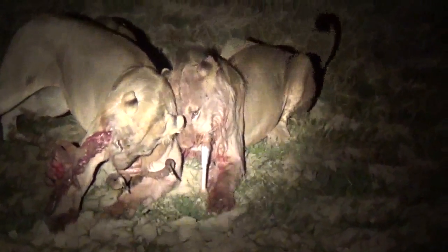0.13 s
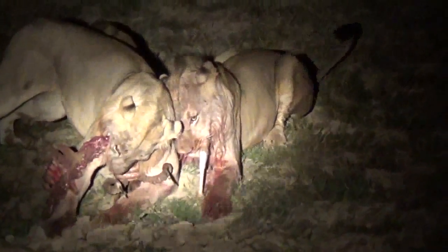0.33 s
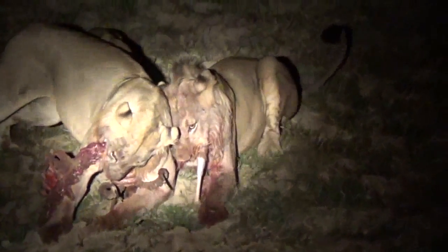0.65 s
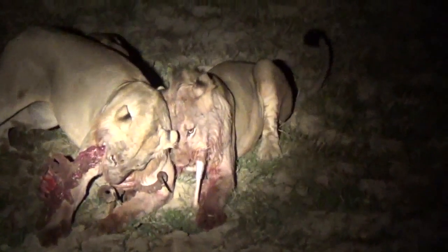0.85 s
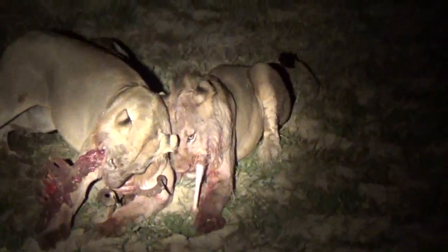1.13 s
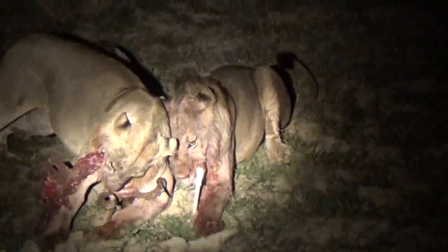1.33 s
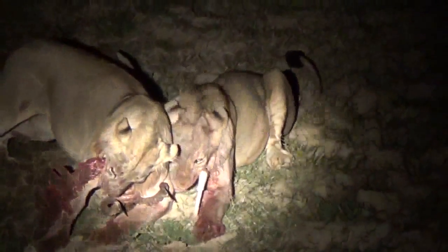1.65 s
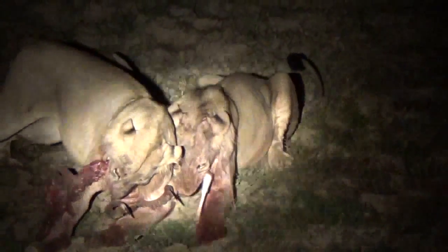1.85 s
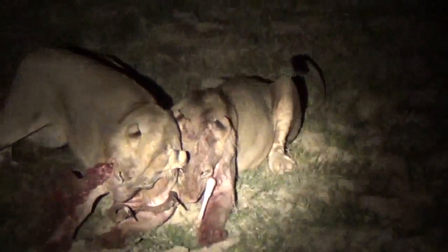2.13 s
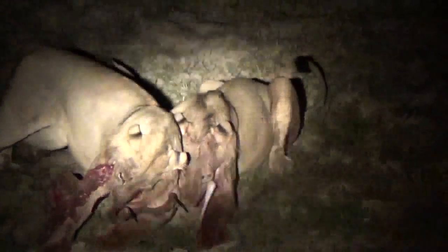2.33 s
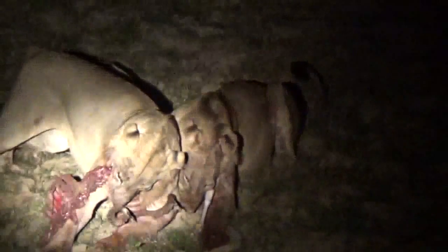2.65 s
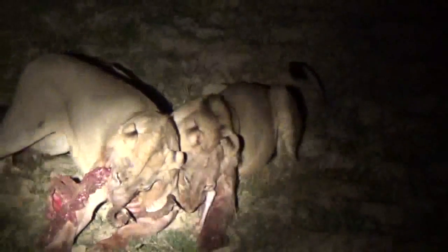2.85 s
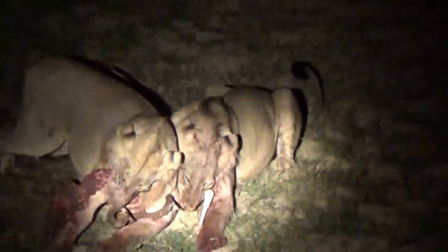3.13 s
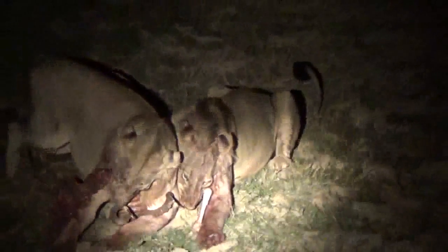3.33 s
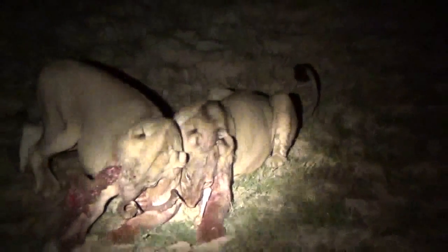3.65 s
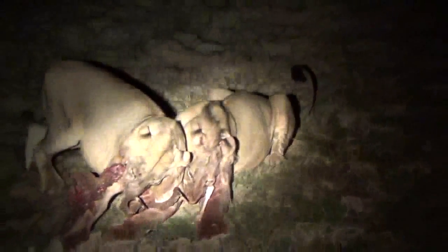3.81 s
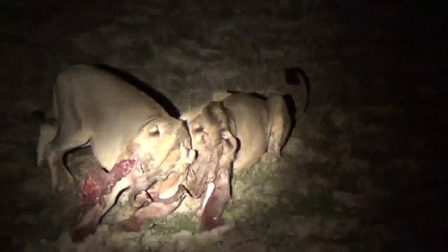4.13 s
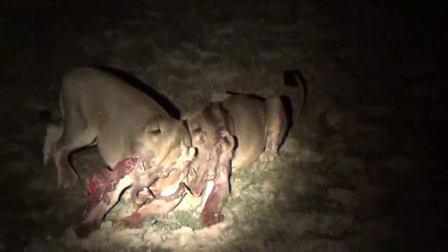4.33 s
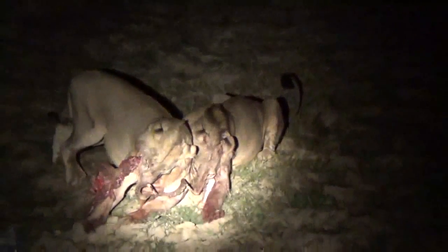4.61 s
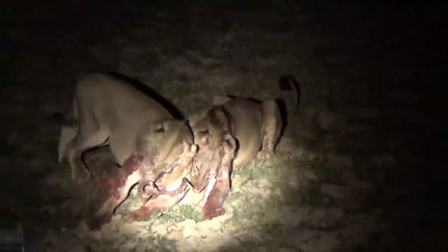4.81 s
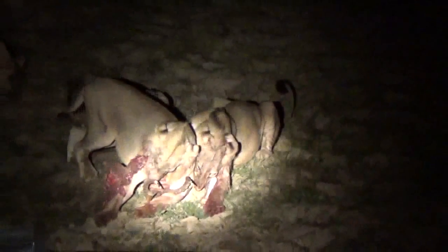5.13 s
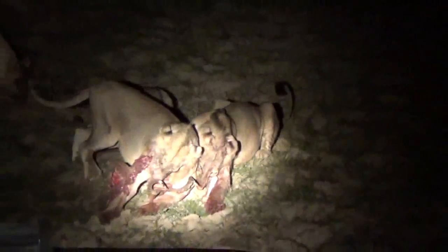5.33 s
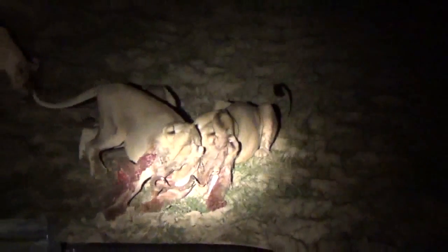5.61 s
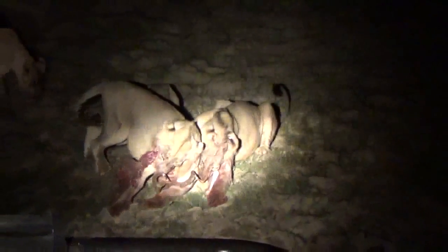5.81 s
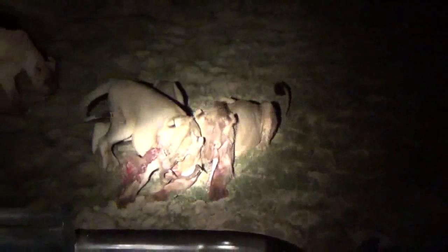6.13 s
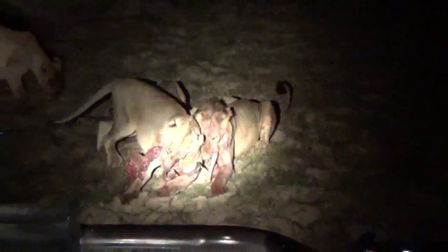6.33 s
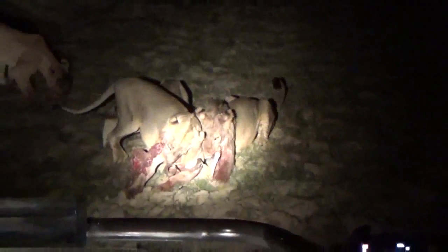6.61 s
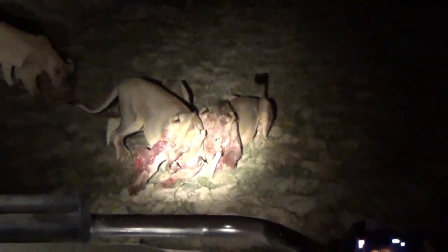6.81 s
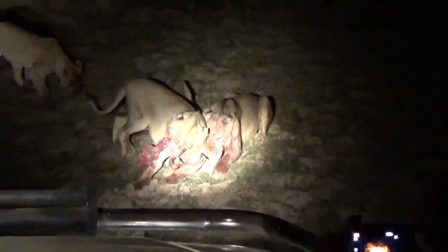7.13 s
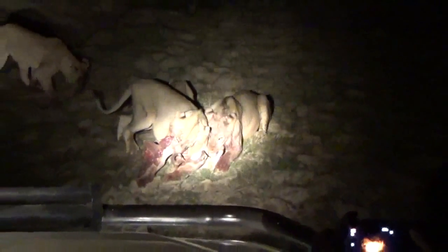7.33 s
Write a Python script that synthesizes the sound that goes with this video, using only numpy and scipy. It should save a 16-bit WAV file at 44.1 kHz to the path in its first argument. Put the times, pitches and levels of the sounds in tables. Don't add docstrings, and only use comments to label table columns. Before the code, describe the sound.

Night in open grass, heard in stereo a few metres from feeding big cats. A rattling growl is already loud at the start, with a second abrupt one at 0.3 seconds, soft smacks and a bright tick. A faint grunt follows near 0.8 and a hard knock at 1.0. A brief low moan at 1.2 leads to a chesty growl around 1.5, then the loudest, ringing and falling from 2.1 to 3. A faint click comes at 3.1. Growling returns at 4 and strongly at 4.5, with small bone cracks near 4.2. Around 5.1 to 5.5 there are smacks, cracks, a chesty growl and breathy snarls with a snort. A tight click at 5.8 and a heavier thump with a crack at 6.2 precede a weak growl at 6.7 and a faint snarl at 7.4. Crickets chirp about twice a second each, a katydid rasps in waves, and a far chorus trills over soft hiss.

```python
import sys
import numpy as np
from scipy import signal
from scipy.fft import rfft, irfft
from scipy.io import wavfile
from scipy.ndimage import uniform_filter1d

SR = 44100
rng = np.random.default_rng(int(sys.argv[2]) if len(sys.argv) > 2 else 0)


def generate_wav(sig):
    pcm = np.round(np.clip(np.atleast_2d(sig).T, -1, 1) * 32767).astype(np.int16)
    wavfile.write(sys.argv[1], SR, pcm)


def to_linear_factor(level_db):
    exponent = np.asarray(level_db, float) / 20
    return 10 ** exponent


N = 328986
TIME = np.arange(N) / SR

# [t/s of the flap at its height, flap rate there/Hz, slowing/(Hz per s)]
GROWL_PACE = [
    (.123, 28.3, 3),
    (.29, 33, 12),
    (.78, 25, 8),
    (1.4826, 24.6, 13),
    (2.116, 26.7, 6.5),
    (3.985, 23.6, 8),
    (4.5207, 24.8, 10.8),
    (5.32, 25.5, 12),
    (6.697, 23.5, 8),
]
# [attack/s, release/s, throat level/dB, chest level/dB, rasp level/dB]
GROWL_EFFORT = [
    (0.91, 0.3, -46, -46.5, -60),
    (.05, 0.14, -50, -48, -63),
    (.1, 0.13, -66.5, -67, -71),
    (0.26, 0.31, -62.5, -57.5, -65.5),
    (.23, 0.86, -40, -48, -55),
    (0.14, 0.44, -57.5, -53, -62),
    (.27, 0.43, -44, -49.5, -58),
    (.17, 0.2, -59.5, -47, -65),
    (0.311, 0.28, -65, -61.5, -68.5),
]
# [loss at start of attack/dB, its curve power, loss at end of release/dB, its curve power]
SWELL_SHAPE = [
    (28, 2.83, 27.5, 2.42),
    (22, 3.5, 16, 1.27),
    (14, 5.6, 10.5, 3),
]
# [t/s, rebound flap over first flap/dB, roughness 0-1]
MANNER = [(0, -2, .35), (.5, -4, .4), (1.4, -8, .25), (1.95, 1, .12), (2.05, 6, .08), (2.17, 6, .1),
          (2.26, -1, .1), (2.36, -10, .14), (2.7, -2, .3), (4.0, -4, .35), (4.4, -2, .1), (4.48, -15, .07),
          (4.62, -12, .07), (4.72, -1, .25), (5.3, -1, .15), (6.7, -4, .5)]
SPEED_UP_HZ_PER_S, CLOSING_DB_PER_S = 8, 120
REBOUND_S, FLAP_S = .0133, .0061
# [f/Hz, width/Hz, level/dB]
THROAT_MODES = [(150, 42, -15.5), (217, 32, 0)]
PHARYNX_MODES = [(313.8, 42, -23.5), (520, 376, -38.5), (744, 340, -40)]
CHEST_MODES = [(51.4, 35, -7.5), (92, 95, -6)]
MOUTH_MODES = [(1287, 160, -1.5), (1580, 240, -0.5), (1900, 240, -6), (2164, 380, 2)]
# [middle t/s, half length/s, level/dB, mouth resonance f/Hz]
SNARLS = [
    (5.239, .09, -57, 560),
    (5.312, 0.054, -53.5, 625),
    (5.386, 0.019, -49, 588),
    (5.439, 0.056, -63, 575),
    (7.375, 0.058, -64, 620),
]
SNARL_FADE_DB = 8.5
# [f/Hz, width/Hz, level/dB]
SNARL_UPPER_MODES = [(1236, 80, 4), (1430, 140, 2)]
# [t/s, f/Hz, level/dB]
MOAN = [
    (1.15, 97.7, -80),
    (1.198, 104, -58),
    (1.224, 102, -56),
    (1.304, 98, -59),
    (1.309, 98.3, -66),
]
# [t/s, peak level/dB, f/Hz, t60/s]
SMACKS = [(.055, -51, 626, .098), (.262, -45.5, 636, .03), (.287, -47, 290, .04), (.46, -51, 570, .054),
          (2.56, -52, 520, .15), (2.629, -52, 540, .087), (3.459, -48.5, 520, .077), (4.05, -52, 490, .089),
          (4.158, -54, 377, .15), (4.2, -51, 303, .12), (4.398, -50, 1600, .06), (4.43, -55, 1430, .08),
          (5.097, -39.5, 457, .023), (5.098, -50, 233, .057), (5.1, -51, 900, .03), (5.133, -47, 370, .05),
          (5.168, -52, 1230, .07), (5.261, -51, 420, .15), (5.286, -49, 1220, .08), (5.33, -51, 330, .12),
          (5.501, -41.5, 115, .046), (5.797, -52, 1200, .03), (7.336, -58, 1260, .13)]
# [f/Hz, peak level/dB, t60/s]
THUMP_RINGS = [(180, -42.5, 0.031), (277, -46.5, 0.18), (460, -47.5, 0.022), (710, -54, 0.12),
               (1010, -50, 0.049)]
THUMP_S = 6.248
# [t/s, peak level/dB, low ring f/Hz, brightness/dB, scatter/s]
GEAR_CLICKS = [
    (0.2474, -26.5, 1493, 24, 0.00113),
    (0.9618, -18, 860, -8, .0015),
    (3.128, -42.5, 1830, -16, .006),
    (5.8495, -32, 1780, -8, 0.00062),
]
BONE_CLICKS = [
    (4.165, -44, 1820, -4, 0.0057),
    (4.183, -38.5, 1700, -11, 0.0019),
    (4.239, -44, 1600, -8, .004),
    (5.129, -40, 1900, -11, 0.0074),
    (5.221, -42, 1186, -29, 0.0065),
    (6.244, -32, 1810, -16, 0.01),
]
# [f/Hz, level/dB, t60/s]
CLICK_BODY = [(1070, 2, 0.018), (1335, 2.5, 0.019), (1614, -1.5, 0.027), (1900, 8, 0.0062),
              (2130, 9, 0.021), (2820, 5.5, 0.016), (3170, 5.5, 0.026), (3890, 0, 0.018), (4910, 0, 0.0081),
              (6030, -13.5, 0.0039), (8300, -31, 0.0027), (10000, -14, 0.0012)]
GEAR_PAN_DB, BONE_PAN_DB, CLICK_T60_S = 4.5, 0, 0.02
# [delay/s, level/dB]
ECHOES = [(.0035, -9.5), (.0052, -8), (.0081, -25), (.011, -17)]
RISING_FIRST_S, RISING_PERIOD_S, HURRY_FROM_S, HURRY_SHARE = .036, .3998, 6.03, .037
RISING_DB, RISING_SPREAD_DB = -56.5, .5
# [t/s, level/dB]
FADING_CRICKET = [(.11, -61), (.51, -60), (.92, -61), (1.32, -61.5), (1.73, -58), (2.13, -65), (4.13, -67),
                  (4.75, -59), (5.14, -60), (5.545, -56.5), (5.94, -59), (6.35, -57)]
# [first t/s, period/s, f/Hz, chirp length/s, level/dB, left over right/dB, tooth flutter 0-1]
EVEN_CRICKETS = [
    (.088, .4221, 3714, .13, -58, -1, .3),
    (.14, .455, 3980, .07, -64, 6, .2),
    (.26, .458, 3620, .08, -67, 0, .2),
]
# [start t/s, length/s, level of the rest that follows/dB]
KATYDID_WAVES = [(-.1, 0.56, -70), (.87, 0.5, -74), (1.814, 0.42, -70), (2.67, 0.5, -69.5),
                 (3.62, 0.43, -72), (4.445, 0.46, -66.5), (5.344, .45, -76), (6.202, .42, -70),
                 (7.073, .5, -70)]
KATYDID_STROKES_HZ, KATYDID_DB, KATYDID_RISE_S, KATYDID_FALL_S = 27, -63, 0.11, 0.062
# [f/Hz, width/Hz, level/dB, left-right likeness 0-1, left over right/dB, flicker/dB]
CHORUS_BANDS = [
    (2398.5, 149, -57, 0.78, 1, 0.5),
    (3844, 490, -58.5, 0.53, 1, 1.5),
    (6376, 1300, -63, 0.66, 1.5, 1.38),
    (3043, 270, -70.5, 0.21, -0.5, 1),
]
# [f/Hz, level/dB]
NIGHT_COLOUR = [(25, -28), (45, -3), (90, -4), (220, 0.5), (500, -3.5), (850, -2.5), (1100, -7),
                (1900, -10), (3000, -20.5), (4900, -15), (8300, -18), (11200, -15)]
# [f/Hz, likeness 0-1]
NIGHT_LIKENESS = [(60, 0.94), (200, 0.82), (400, 0.42), (900, 0.04), (2000, 0), (5000, 0.47), (11000, 0.66)]
NIGHT_DB = -58
TREBLE_END_HZ = 11060


def flap_count():
    count = np.zeros(N)
    for (s, rate, slowing), (attack, *_) in zip(GROWL_PACE, GROWL_EFFORT):
        t = TIME - s
        mine = t > -attack
        change = np.where(t < 0, SPEED_UP_HZ_PER_S, -slowing)
        count[mine] = (rate * t + change * t ** 2 / 2)[mine]
    return count


def flaps():
    rebound_db, rough = in_time(MANNER)
    at = np.flatnonzero(np.diff(np.floor(flap_count())) > 0)
    chance = rng.standard_normal((4, len(at))) * rough[at]
    pulses = np.zeros(N + SR)
    first = np.maximum(at + (SR * (.001 + .006 * chance[0])).astype(int), 0)
    pulses[first] += to_linear_factor(6 * chance[1])
    delay = (REBOUND_S - .00026 * np.maximum(rebound_db[at], 0)) * (1 + .3 * chance[2])
    pulses[first + (SR * delay).astype(int)] += to_linear_factor(rebound_db[at] + 3.3 * chance[3])
    pulses = pulses[:N]
    puff = signal.lfilter([1], [1, -np.exp(-1 / (.0055 * SR))], pulses)
    return pulses, puff, rough


def effort():
    out = np.zeros((3, N))
    for (s, *_), (attack, release, *peaks_db) in zip(GROWL_PACE, GROWL_EFFORT):
        before = np.maximum(s - TIME, 0) / attack
        after = np.maximum(TIME - s, 0) / release
        closed_s = np.maximum(np.maximum(s - attack - TIME, TIME - s - release), 0)
        for k, (rise_db, rise_power, fall_db, fall_power) in enumerate(SWELL_SHAPE):
            loss_db = rise_db * before ** rise_power + fall_db * after ** fall_power
            loss_db = loss_db + CLOSING_DB_PER_S * closed_s
            out[k] = np.maximum(out[k], to_linear_factor(peaks_db[k] - loss_db))
    return out


def growls(pulses, puff, rough):
    throat_gain, chest_gain, rasp_gain = effort()
    air = rng.standard_normal((3, N))
    source = .11 * rough * air[0] * (puff + .3) - pulses
    pressed = to_linear_factor(0.33 * in_time(MANNER)[0])
    flap = np.hanning(int(FLAP_S * SR))
    soft = np.convolve(source, flap / flap.sum(), "same")
    upper_throat = band(cavity(source, PHARYNX_MODES), 355, 570)
    throat = even_out(cavity(soft, THROAT_MODES) + pressed * upper_throat)
    chest = even_out(cavity(uniform_filter1d(soft, size=300), CHEST_MODES))
    breath = air[2] * (puff + .2) + 4.5 * pulses
    mouth = pressed ** 2.4 * cavity(breath, MOUTH_MODES[:2]) + cavity(breath, MOUTH_MODES[2:])
    rasp = even_out(band(mouth, 1250, 2700))
    return throat_gain * throat + chest_gain * chest + rasp_gain * rasp


def snarls(puff):
    levels_db = [db - SNARL_FADE_DB * ((TIME - s) / half) ** 2 for s, half, db, _ in SNARLS]
    mouth_hz = in_time(SNARLS)[2]
    air = rng.standard_normal((3, N)) * (puff + 1.2)
    narrow = signal.sosfilt(signal.butter(2, 24, fs=SR, output="sos"), air[:2])
    turns = 2 * np.pi * np.cumsum(mouth_hz) / SR
    low = even_out(narrow[0] * np.cos(turns) + narrow[1] * np.sin(turns), span_s=0.043)
    upper = to_linear_factor(-7.5) * rms_one(cavity(air[2], SNARL_UPPER_MODES))
    hoarse = to_linear_factor(-3) * rms_one(band(air[2], 320, 1220))
    flutter = to_linear_factor(-3) * rms_one(band(puff, 92, 130))
    return to_linear_factor(np.max(levels_db, axis=0)) * (low + upper + hoarse + flutter)


def moan():
    s, hz, level_db = np.transpose(MOAN)
    turns = 2 * np.pi * np.cumsum(np.interp(TIME, s, hz)) / SR
    return np.sqrt(2) * to_linear_factor(np.interp(TIME, s, level_db, -120, -120)) * np.sin(turns)


def smacks():
    out = np.zeros(N)
    thump = [(THUMP_S, db, hz, t60) for hz, db, t60 in THUMP_RINGS]
    for s, db, hz, t60 in SMACKS + thump:
        push = np.zeros(int(.3 * SR))
        push[:150] = rng.standard_normal(150) * np.hanning(150)
        sound = ring(push, hz, t60) + .5 * ring(-push, hz * 1.19, t60 * 0.85)
        i = int(s * SR)
        out[i:i + len(sound)] += (to_linear_factor(db) * sound / np.abs(sound).max())[:N - i]
    return out


def clicks():
    out = np.zeros((2, N))
    placed = [(*c, GEAR_PAN_DB) for c in GEAR_CLICKS] + [(*c, BONE_PAN_DB) for c in BONE_CLICKS]
    length = int(.2 * SR)
    for s, db, hz, bright_db, scatter, pan_db in placed:
        cracks = np.zeros((2, length))
        draw = rng.random((3, 6))
        cracks[:, (draw[0] * scatter * SR).astype(int)] = 2 * draw[1:] - 1
        cracks[:, 0] = 1
        bright = sum(to_linear_factor(mode_db + bright_db) * ring(cracks[k % 2], mode_hz, t60)
                     for k, (mode_hz, mode_db, t60) in enumerate(CLICK_BODY))
        fade = np.exp(-TIME[:length] / (0.0023 + scatter / 2))
        snap = to_linear_factor(bright_db + 11) * rng.standard_normal(length) * fade
        sound = band(ring(cracks[0], hz, CLICK_T60_S) + bright + snap, 500, 14000)
        i = int(s * SR)
        out[:, i:i + length] += pan(to_linear_factor(db) * sound / np.abs(sound).max(), pan_db)
    return out


def outdoors(x):
    bright = band(x.mean(axis=0), 730, 3300)
    out = x.copy()
    for k, (s, db) in enumerate(ECHOES):
        lag = int(s * SR)
        out[k % 2, lag:] += to_linear_factor(db) * bright[:-lag]
    return out


def crickets():
    due = RISING_FIRST_S + RISING_PERIOD_S * np.arange(19)
    due = due - HURRY_SHARE * np.maximum(due - HURRY_FROM_S, 0)
    rising = zip(due, rng.normal(RISING_DB, RISING_SPREAD_DB, len(due)))
    out = pan(chirps(rising, 3900, 225, .122, .12), 11)
    out += pan(chirps(FADING_CRICKET, 3795, -47, 0.17, 0.075), 1.1)
    for first, period, hz, length, db, pan_db, flutter in EVEN_CRICKETS:
        notes = [(s, db + rng.normal(0, 0.31)) for s in first + period * np.arange(18)]
        out += pan(chirps(notes, hz, -17, length, flutter), pan_db)
    return out


def chirps(notes, hz, glide_hz, length, flutter):
    out = np.zeros(N)
    t = np.arange(-length / 2, length / 2, 1 / SR)
    swell = np.abs(np.cos(np.pi * t / length)) ** .8
    pitch = hz + glide_hz * np.sin(2.6 * (t / length + .1)) / 2
    for s, db in notes:
        start = 2 * np.pi * rng.random(2)
        tone = np.sin(2 * np.pi * np.cumsum(pitch) / SR + start[0])
        teeth = 1 + flutter * np.sin(2 * np.pi * 86 * t + start[1])
        at = int(s * SR) + (t * SR).astype(int)
        inside = (at >= 0) & (at < N)
        out[at[inside]] += (to_linear_factor(db) * 2 * swell * tone * teeth)[inside]
    lag = int(0.082 * SR)
    out[lag:] += to_linear_factor(-10.0) * out[:-lag]
    return out * to_linear_factor(1.6 * drift(25))


def katydids():
    stroke = (.5 + .5 * np.cos(2 * np.pi * KATYDID_STROKES_HZ * TIME + .8 * drift(2))) ** 1.5
    rasp = resonate(resonate(pair(.88), 10600, 1900), 10600, 1900)
    next_starts = [wave[0] for wave in KATYDID_WAVES[1:]] + [9]
    corners = []
    for (s, length, rest_db), next_s in zip(KATYDID_WAVES, next_starts):
        corners += [(s, KATYDID_DB), (s + length, KATYDID_DB)]
        corners += [(s + length + KATYDID_FALL_S, rest_db), (next_s - KATYDID_RISE_S, rest_db)]
    return to_linear_factor(in_time(corners)[0]) * rms_one(rasp * (2.2 + stroke) * to_linear_factor(1.3 * drift(37)))


def chorus():
    out = 0
    for hz, width, db, alike, pan_db, flicker_db in CHORUS_BANDS:
        once = resonate(pair(alike), hz, 1.29 * width)
        trill = rms_one(resonate(once, hz, 1.29 * width))
        flicker = flicker_db * (drift(5.9) / 2 + drift(20))
        out = out + trill * pan(to_linear_factor(db + flicker), pan_db)
    return out


def night():
    log_hz = np.log(np.maximum(np.fft.rfftfreq(N, 1 / SR), 1))
    colour_hz, colour_db = np.transpose(NIGHT_COLOUR)
    alike_hz, alike = np.transpose(NIGHT_LIKENESS)
    colour = np.interp(log_hz, np.log(colour_hz), colour_db)
    alike = np.clip(np.interp(log_hz, np.log(alike_hz), alike), 0, 1)
    mid, side = rfft(rng.standard_normal((2, N))) * to_linear_factor(colour)
    both = np.sqrt(1 + alike) * mid + np.sqrt(1 - alike) * side * [[1], [-1]]
    return to_linear_factor(NIGHT_DB + 1.1 * drift(5.5)) * rms_one(irfft(both, N))


def rms_one(x):
    return x / np.sqrt(np.mean(x ** 2) + 1e-20)


def even_out(x, span_s=.12):
    return x / np.sqrt(np.abs(uniform_filter1d(x ** 2, size=int(span_s * SR))) + 1e-12)


def in_time(rows):
    s, *columns = np.transpose(rows)
    return [np.interp(TIME, s, c) for c in columns]


def drift(rate):
    knots = np.arange(int(N / SR * rate * 2) + 2)
    return np.interp(TIME * rate * 2, knots, rng.standard_normal(len(knots))) * 1.2


def resonate(x, hz, width_hz):
    r = np.exp(-np.pi * width_hz / SR)
    rise = np.array([1, 0, -1]) * (1 - r * r) / 2
    return signal.lfilter(rise, [1, -2 * r * np.cos(2 * np.pi * hz / SR), r * r], x + 1e-18)


def cavity(x, modes):
    return sum(to_linear_factor(db) * resonate(x, hz, width) for hz, width, db in modes)


def ring(pushes, hz, t60):
    r = to_linear_factor(-60 / (t60 * SR))
    w = 2 * np.pi * hz / SR
    return signal.lfilter([0, np.sin(w)], [1, -2 * r * np.cos(w), r * r], pushes + 1e-18)


def band(x, lo_hz, hi_hz, order=2):
    return signal.sosfilt(signal.butter(order, [lo_hz, hi_hz], "band", fs=SR, output="sos"), x)


def pan(x, db):
    return np.array([x * to_linear_factor(db / 2), x * to_linear_factor(-db / 2)])


def pair(alike):
    mid, side = rng.standard_normal((2, N))
    return np.sqrt((1 + alike) / 2) * mid + np.sqrt((1 - alike) / 2) * side * [[1], [-1]]


def scene():
    pulses, puff, rough = flaps()
    cats = growls(pulses, puff, rough) + snarls(puff) + moan() + smacks()
    near = outdoors(pan(cats, 0) + clicks())
    return near + crickets() + katydids() + chorus() + night()


def band_limit(x):
    return signal.sosfilt(signal.butter(12, 12350, fs=SR, output="sos"), x)


def record(dry):
    bass_cut = signal.sosfilt(signal.butter(4, 40, "high", fs=SR, output="sos"), dry)
    top_cut = signal.sosfilt(signal.ellip(12, .5, 50, TREBLE_END_HZ, fs=SR, output="sos"), bass_cut)
    return band_limit(top_cut)


dry = scene()
out = record(dry)
generate_wav(out)
```